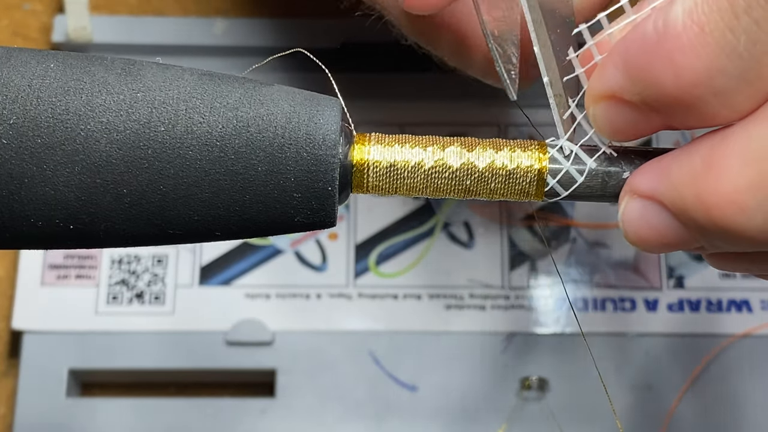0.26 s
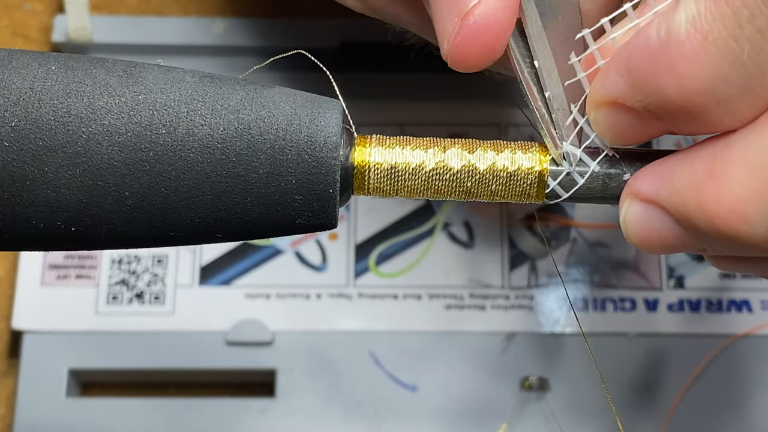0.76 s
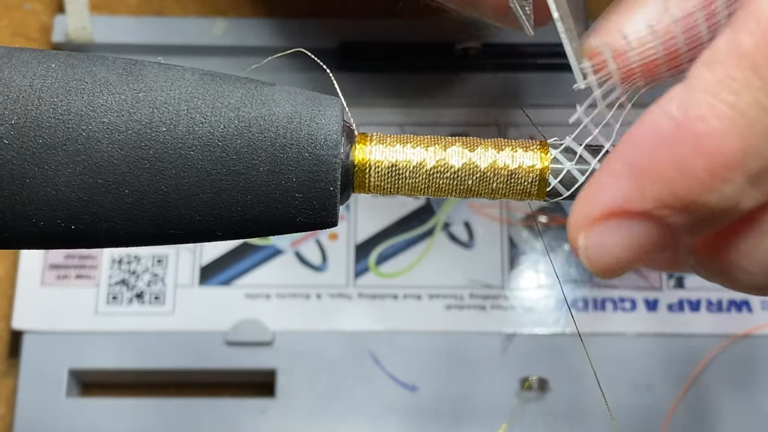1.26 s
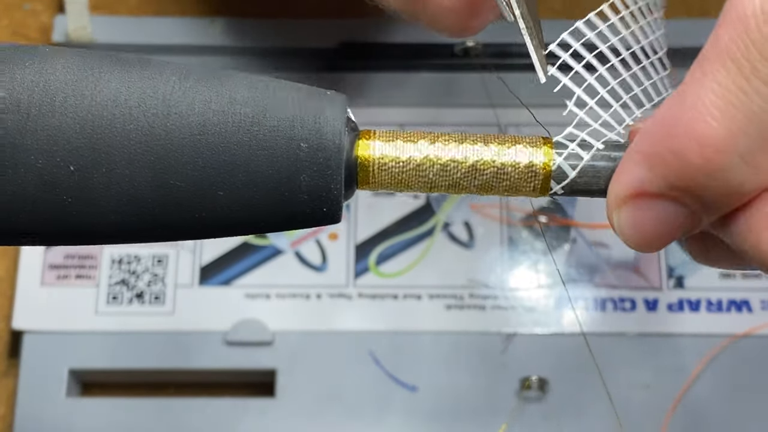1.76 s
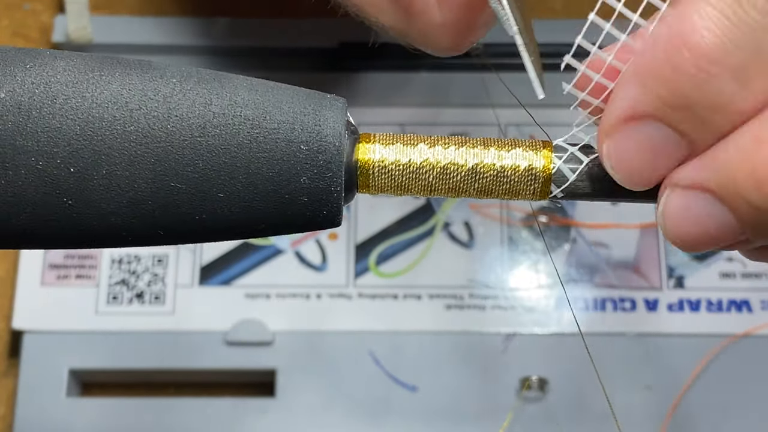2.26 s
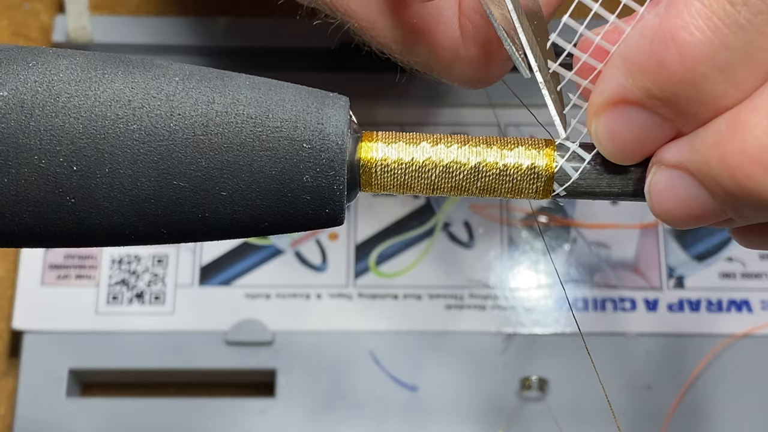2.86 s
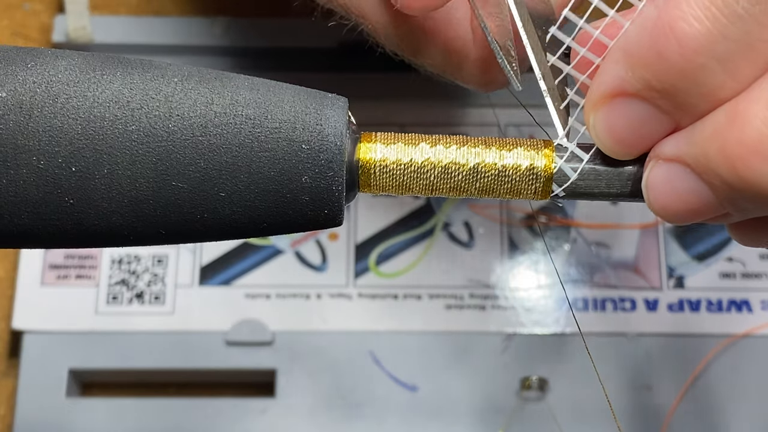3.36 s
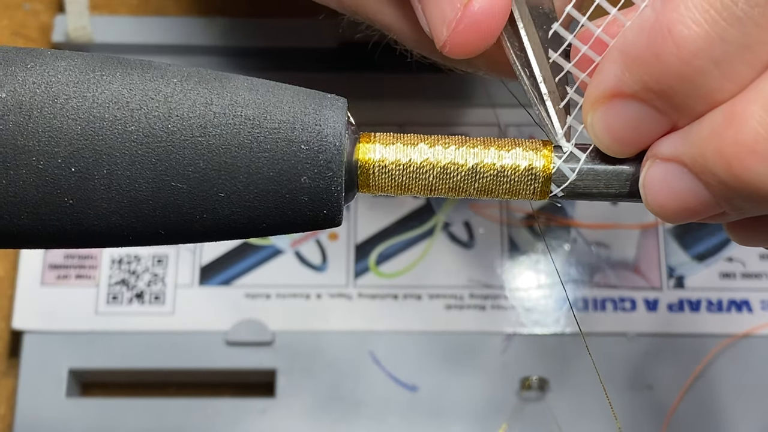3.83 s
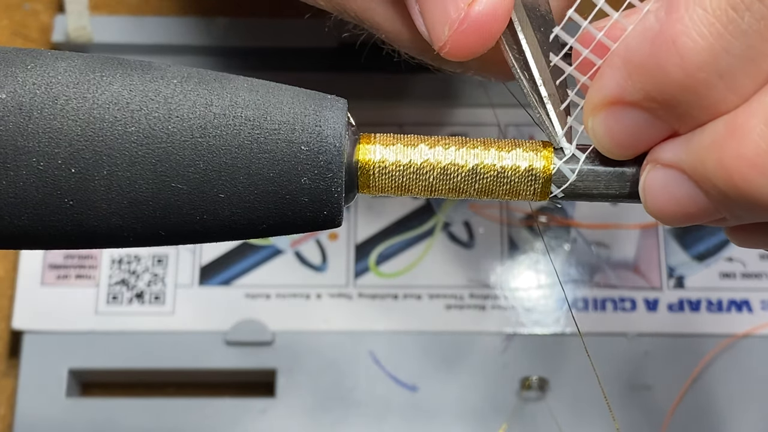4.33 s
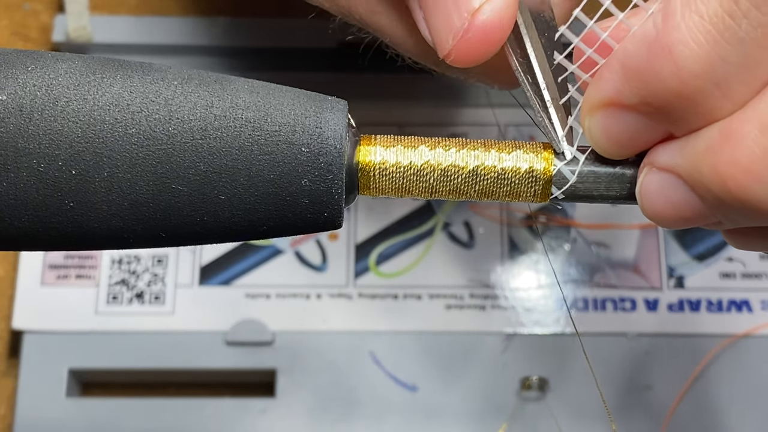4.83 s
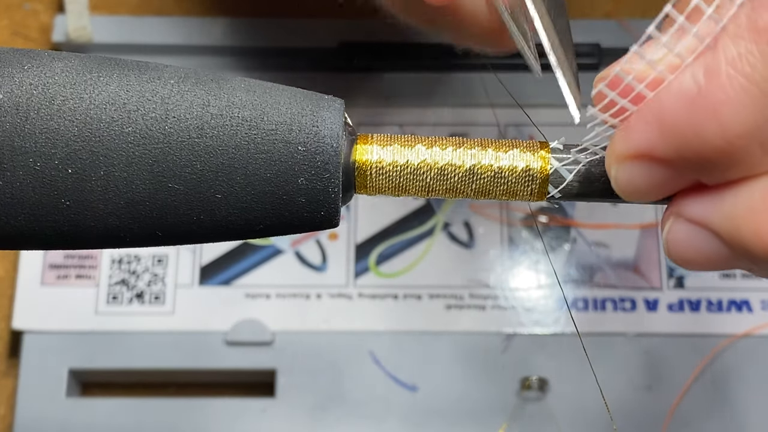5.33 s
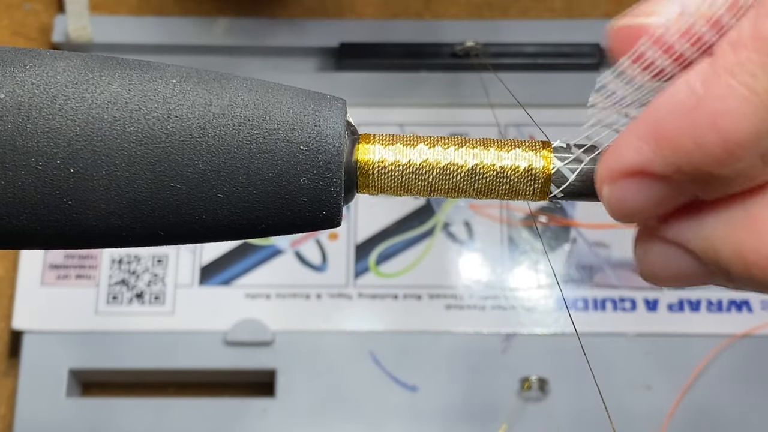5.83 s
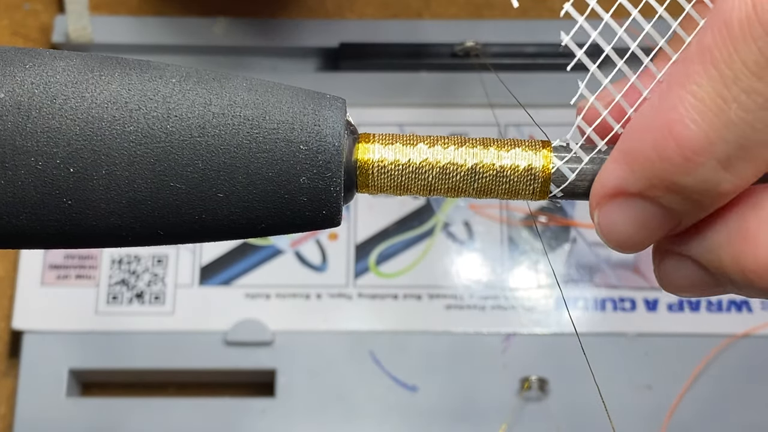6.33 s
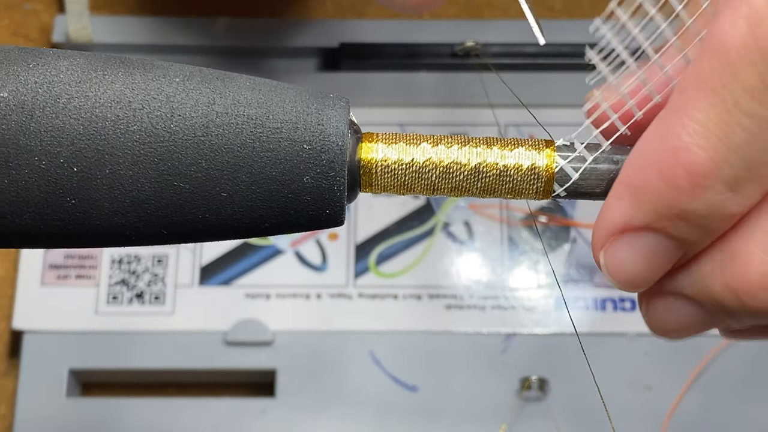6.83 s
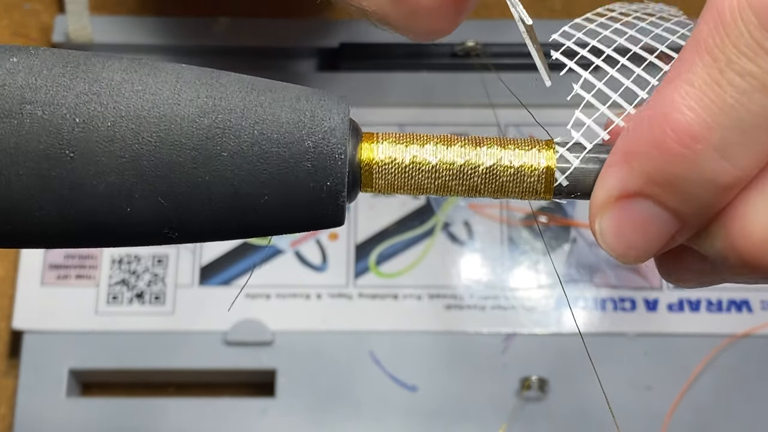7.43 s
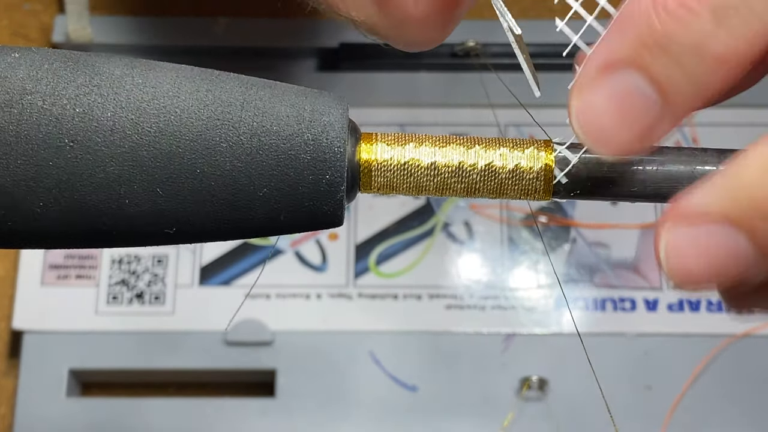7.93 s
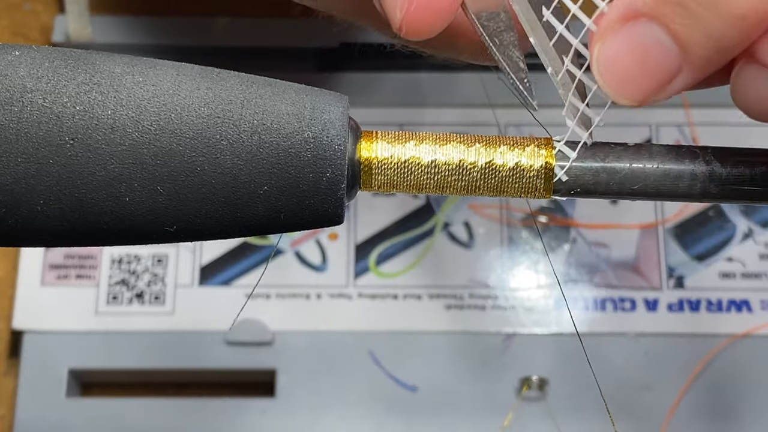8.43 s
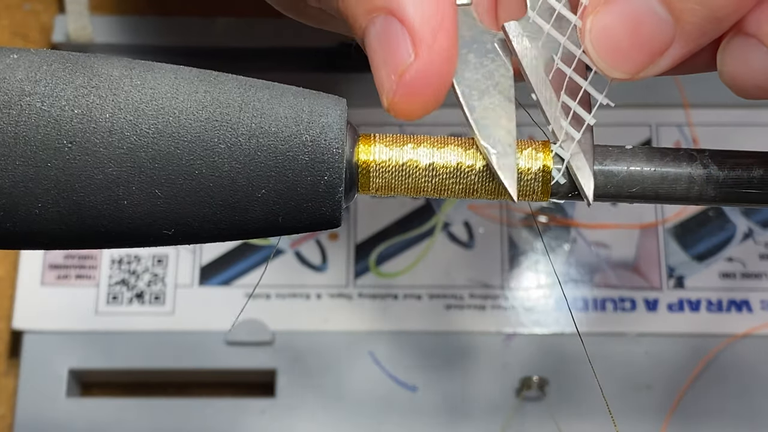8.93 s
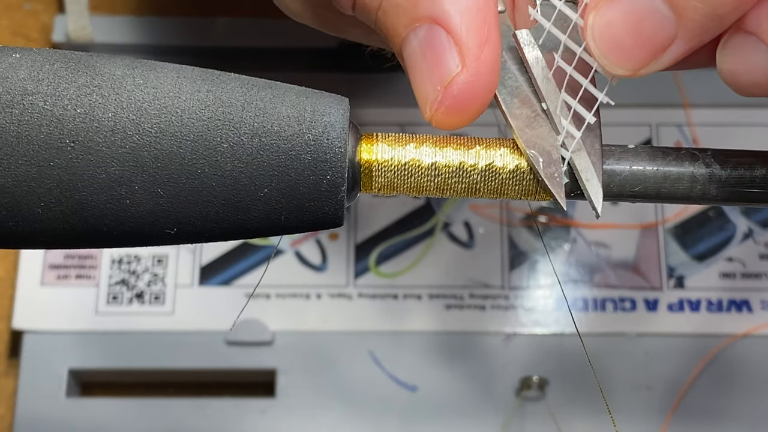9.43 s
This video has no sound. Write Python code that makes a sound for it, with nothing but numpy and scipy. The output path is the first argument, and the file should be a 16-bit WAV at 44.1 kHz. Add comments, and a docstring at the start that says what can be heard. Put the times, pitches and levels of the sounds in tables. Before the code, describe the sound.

Indoors, small scissors trim stiff mesh tape on a rod right by the microphone. A sharp snip comes early, then faint scrapes and ticks, a dense cluster of hard metallic snaps midway, a long near-quiet spell, a double snap later and one last crisp snip. A low hum and rumble continue underneath, with slow puffs of air from moving hands.

```python
"""First a quiet room hums for a moment, then small steel scissors trim mesh tape on a rod, close by.
The blades scrape and snap through the strands: bursts of noise ring the many modes of the steel.
The hollow plastic cradle under the rod knocks along through a few low modes of its own.
Moving hands push slow air at the microphone. An appliance adds steady tones, and shaped noise
gives the rumble and hiss of the room."""
import sys
import numpy as np
from scipy import signal
from scipy.fft import rfft, irfft, next_fast_len
from scipy.io import wavfile
from scipy.ndimage import uniform_filter1d, map_coordinates

SR = 44100
rng = np.random.default_rng(int(sys.argv[2]) if len(sys.argv) > 2 else 0)


def digitize_waveform(pressure):
    """Quantize a signal to 16-bit integers and store it at the path in sys.argv[1].

    Rows of a 2-D input are taken as channels; values are limited to [-1, 1].
    """
    field = np.atleast_2d(pressure).T
    bounded = np.clip(field, -1, 1)
    quanta = np.round(bounded * 32767).astype(np.int16)
    wavfile.write(sys.argv[1], SR, quanta)


def convert_level_to_amplitude(level_db):
    """Map a level in decibels to its linear amplitude factor."""
    exponent = np.asarray(level_db, float) / 20
    return 10 ** exponent


N = 426888  # length in samples


# strands cut and tips touching:
# (time [s], peak level in the blades [dB], cradle peak relative to the blades [dB])
SNAP_EVENTS = [(0.3512, -53.5, -23.5), (0.415, -48.5, -11.5), (0.4764, -52, -8.5), (0.521, -46.5, -20.5),
               (0.5327, -47.5, -21), (0.6165, -59, -5), (0.7091, -20.5, -30.5), (0.998, -45.5, -36),
               (1.0232, -52, -15), (1.0997, -57, -19), (1.292, -60, -28), (1.322, -58, -31),
               (1.36, -50.5, -24), (1.7245, -54.5, 5), (2.029, -47, -18), (2.0445, -31, -22),
               (2.0772, -40, -12), (3.451, -62, -26), (3.5992, -52, -25), (3.7344, -39, -34),
               (3.7491, -34, -25), (3.9539, -63, -4), (4.1308, -54.5, -5), (4.1494, -42, -15),
               (4.2016, -43, -40), (4.2337, -54, -30), (4.2601, -58, -30), (4.6992, -50, -10),
               (4.7121, -27.5, -34), (4.7192, -16, -38.5), (4.7258, -20, -30.5), (4.7344, -22.5, -19),
               (4.9931, -29.5, -27), (5.008, -23, -27), (5.014, -20.5, -26), (5.0239, -24.5, -19),
               (5.0365, -24, -29), (5.043, -14.5, -22.5), (5.0556, -30, -12.5), (5.2954, -49, -32.5),
               (5.3396, -42, -42.5), (5.3774, -43, -39), (5.7703, -60, -11.5), (5.7994, -74, 5),
               (7.0874, -53, 3), (7.1004, -64, -13), (7.7787, -60.5, -15.5), (7.8283, -38, -26),
               (7.8461, -25, -17), (7.8567, -24.5, -15.5), (8.3828, -66.5, 1), (8.4527, -44, -16),
               (9.2721, -33.5, -54.5), (9.6538, -39.5, -47), (9.6614, -15.5, -45)]
CRACK_T60_S, CRACK_RISE_S, KNOCK_T60_S = 0.013, 0.0006, 0.024


def snaps():
    """Each parting strand is a crack of a few milliseconds in the blades, and a soft knock in the cradle."""
    out = np.zeros(N + SR)
    t = np.arange(SR // 6) / SR
    for s, db, cradle_db in SNAP_EVENTS:
        decay = convert_level_to_amplitude(-60 * t / CRACK_T60_S)
        rise = 1 - np.exp(-t / CRACK_RISE_S)
        crack = rng.standard_normal(len(t)) * decay * rise
        crack[0] += 2.5  # the instant of parting
        push = rng.standard_normal(len(t)) * convert_level_to_amplitude(-60 * t / KNOCK_T60_S)
        snap = peak_one(steel(crack, s, wide_db=-7.5, damping=1.1))
        knock = convert_level_to_amplitude(cradle_db) * peak_one(cradle(push, scatter_db=4))
        add_at(out, s, convert_level_to_amplitude(db) * (snap + knock))
    return out[:N]


# strokes of blade on blade, tape and rod:
# (time of the peak [s], swell [s], fade [s], blade level [dB], cradle level [dB])
STROKE_EVENTS = [(0.311, 0.041, 0.094, -67, -82), (.362, 0.091, 0.27, -52.5, -85),
                 (.416, 0.059, 0.026, -48.5, -60), (.45, 0.081, 0.13, -56, -65),
                 (0.541, 0.093, 0.086, -66.5, -92), (.63, .015, .15, -62.5, -69),
                 (.676, 0.063, 0.1, -53, -56.5), (.71, 0.039, 0.033, -39, -57),
                 (.886, .03, 0.042, -92, -68.5), (1.028, 0.039, 0.058, -44.5, -77),
                 (1.3, .02, 0.088, -75, -96), (1.37, 0.075, 0.056, -63, -72),
                 (1.735, 0.013, 0.068, -58, -56.5), (1.762, 0.032, 0.096, -46, -62),
                 (1.825, 0.067, 0.04, -51.5, -74), (2.048, 0.017, 0.024, -42.5, -48),
                 (2.08, 0.043, 0.047, -44, -46), (2.844, 0.083, 0.085, -76, -101),
                 (3.565, .06, 0.071, -69, -71), (3.602, 0.074, 0.11, -60, -58),
                 (3.745, 0.024, 0.067, -38, -51), (3.99, .08, 0.04, -71.5, -63.5),
                 (4.152, 0.022, 0.06, -42, -59.5), (4.19, 0.051, 0.026, -47.5, -83),
                 (4.25, .05, 0.056, -66, -92), (4.495, .04, 0.06, -71.5, -57.5),
                 (4.724, 0.015, 0.047, -25, -44.5), (4.8, 0.071, 0.23, -64.5, -72),
                 (5.0, 0.024, 0.073, -49, -57), (5.042, 0.036, .02, -27, -42.5),
                 (5.075, 0.046, 0.082, -67, -58.5), (5.25, 0.067, .05, -79.5, -68),
                 (5.33, 0.052, 0.1, -55.5, -94), (5.365, .06, 0.055, -58.5, -99.5),
                 (5.775, .015, .08, -68.5, -86), (5.804, 0.038, 0.027, -83, -57), (5.93, .08, .1, -77, -96),
                 (6.61, .1, 0.095, -81.5, -88), (6.78, .1, .04, -79.5, -80),
                 (7.105, 0.044, 0.053, -59.5, -44), (7.15, 0.1, 0.17, -68.5, -54.5),
                 (7.31, 0.052, 0.18, -75.5, -68), (7.4, .12, .1, -76, -82.5),
                 (7.54, 0.12, 0.13, -79.5, -68), (7.69, .06, .04, -82, -89.5),
                 (7.855, 0.036, 0.051, -40.5, -46.5), (8.44, 0.03, .09, -57.5, -62),
                 (8.5, .06, .08, -79, -74.5), (8.635, .05, .06, -80.5, -91.5), (9.02, .07, 0.12, -64, -85),
                 (9.275, .008, 0.063, -51.5, -88), (9.652, 0.03, .04, -57, -58), (9.39, .08, .08, -82, -86),
                 (9.666, .015, 0.03, -23, -47.5)]
EDGE_DB = 24  # level lost over one swell or fade
CRADLE_LAG_S = 0.01  # the cradle builds up a little later


def strokes():
    """Rough edges slip in tiny uneven jerks that drive blades and cradle together."""
    out = np.zeros(N + SR)
    t = np.arange(-SR // 5, SR // 4) / SR  # zero at the peak of the stroke
    for s, swell, fade, db, cradle_db in STROKE_EVENTS:
        def shape(u):
            return convert_level_to_amplitude(-EDGE_DB * np.maximum(-u / swell, u / fade))

        jerks = unit(uniform_filter1d(rng.standard_normal(len(t)), size=90))
        jerk_db = 2.8 * jerks + 1.5 * rng.exponential(size=len(t))
        force = rng.standard_normal(len(t)) * convert_level_to_amplitude(jerk_db)
        scrape = convert_level_to_amplitude(db) * shape(t) * unit(steel(force, s, wide_db=-5, damping=1.5))
        drone = convert_level_to_amplitude(cradle_db) * shape(t - CRADLE_LAG_S) * unit(cradle(force, scatter_db=5.5))
        add_at(out, s + t[0], scrape + drone)
    return out[:N]


# ticks of the pivot: (time [s], peak level [dB], handle tap relative to the tick [dB])
TICK_EVENTS = [(2.254, -49, -41), (3.1739, -48.5, 1)]


def ticks():
    """The loose pivot ticks brightly as the open blades shift, with a weak or strong duller handle tap."""
    out = np.zeros(N + SR)
    t = np.arange(SR // 4) / SR
    for s, db, tap_db in TICK_EVENTS:
        fading = convert_level_to_amplitude(-60 * t / 0.024) + 0.38 * convert_level_to_amplitude(-60 * t / 0.19)  # a fast and a slow decay
        blow = rng.standard_normal(len(t)) * fading
        bright = filtered(blow, lambda f: band(5500, 0.3)(f) ** 4)
        dull = filtered(blow, lambda f: band(2200, 0.6)(f) ** 4)
        add_at(out, s, convert_level_to_amplitude(db) * (peak_one(bright) + convert_level_to_amplitude(tap_db) * peak_one(dull)))
    return out[:N]


# modes of the blades: (pitch [Hz], width before damping [Hz], relative level before scatter [dB])
BLADE_MODES = [(1000, 52, -4), (1223, 30, -0.5), (1390, 14, 1.5), (1870, 180, -10.5), (2130, 48, 3),
               (2405, 14, 4.5), (2770, 40, 6), (3001, 35, 5), (3340, 40, 4.5), (3615, 35, 3.5),
               (3855, 30, 3), (3886, 31, -5.5), (4280, 29, -0.5), (4475, 33, 1), (4490, 25, 2),
               (4780, 25, 3), (5484, 120, -10), (6130, 37, 5.5), (6704, 440, -6.5), (7380, 47, -16),
               (8102, 290, 0.5), (9720, 530, 0), (11050, 360, 1)]
# stretches of those modes, handles to tips, before the grip changes them:
# (centre [Hz], width as share of pitch [1], relative level [dB])
MODE_STRETCHES = [(1250, 0.47, -13.5), (2050, 0.47, -8), (3115, 0.48, 0), (4700, 0.42, -1),
                  (6600, 0.29, -5.5), (9900, .52, -11.5)]
# the grip, from a time on: (time [s], modes most affected [Hz], their lift [dB],
# brightness [dB per octave], lift of the handles [dB])
GRIP_CHANGES = [(0.28, 3000, 6.5, 7, 18.5), (0.61, 3600, -22, -4.5, -23), (0.69, 3227, 8, 4.5, 0),
                (0.95, 3230, -22, -5, -32), (1.28, 3330, 4.5, -1.5, -5), (1.72, 6600, 8.5, 3, 20),
                (2.01, 3244, 17, -2.5, -2), (2.75, 2050, 25, -6, 13), (3.44, 8260, 28, 9, 10.5),
                (3.52, 2050, 1, -7, -13), (3.72, 2050, -1, -4, -1.5), (4.12, 2050, -3, -5, -13),
                (4.19, 2050, -9, 6.5, 0), (4.46, 2050, 7, -1, 0), (4.705, 4640, 5, 3, -1),
                (4.99, 4700, 11, 1.5, 7), (5.04, 4040, 19, 4.5, 10.5), (5.28, 4700, 27, -5, -3),
                (5.35, 9900, 16, 9.5, -11), (5.76, 2050, 22, -1, -3), (7.07, 6600, 17.5, -7.5, 3.5),
                (7.26, 5460, 25, 3.5, 3), (7.5, 2050, 12.5, 0.5, -1.5), (7.77, 3470, 9, -2, 3.5),
                (8.37, 3237, 7.5, 3.5, 15.5), (8.95, 2620, 3.5, -3.5, 10), (9.26, 2050, -9.5, 3.5, -21.5),
                (9.63, 2987, 3, 5, 5)]
GRIP_OCTAVES = 0.35  # reach of a grip along the modes


def steel(force, s, wide_db, damping):
    """The grip at time s sets which stretch of modes rings; a wide rasp fills in between the modes."""
    starts = [row[0] for row in GRIP_CHANGES]
    now = max(np.searchsorted(starts, s + 0.005) - 1, 0)
    _, grip_hz, lift_db, bright_db, handles_db = GRIP_CHANGES[now]
    levels = []
    for hz, _, db in MODE_STRETCHES:
        tilt_db = bright_db * np.log2(hz / MODE_STRETCHES[2][0])
        nearness = np.exp(-(np.log2(hz / grip_hz) / GRIP_OCTAVES) ** 2)
        levels.append(db + tilt_db + lift_db * nearness)
    levels[0] += handles_db
    ring = modes(BLADE_MODES, scatter_db=3.5, damping=damping)

    def gain(f):
        power = convert_level_to_amplitude(2 * (levels[-1] - 49)) * (f > 12000)  # a faint fizz above the last mode
        for db, (hz, share, _) in zip(levels, MODE_STRETCHES):
            distance = abs(2 * np.log((f + 1) / hz) / share)
            power = power + convert_level_to_amplitude(2 * db) / (hz * share) / (1 + distance ** 10)
        return np.sqrt((abs(ring(f)) ** 2 + convert_level_to_amplitude(2 * wide_db)) * power)

    return filtered(force, lambda f: causal(gain(f)))


# modes of the cradle: (pitch [Hz], width [Hz], relative level before scatter and the wide band [dB])
CRADLE_MODES = [(585, 81, -8.5), (692, 35, -5), (734.5, 24, 0), (791, 8.7, 1), (865, 50, -9)]


def cradle(force, scatter_db):
    """The hollow cradle radiates only around its own few modes."""
    ring = modes(CRADLE_MODES, scatter_db)
    return filtered(force, lambda f: ring(f) * band(760, 0.8)(f) ** 2)


# slow air pushes: (time of the peak [s], peak level [dB], half length [s])
AIR_PUSHES = [(.037, -26, .05), (.156, -19, .035), (.264, -31, .04), (.947, -37, .04), (1.225, -24, .035),
              (2.145, -21, .07), (2.8, -31, .06), (3.209, -29, .035), (3.56, -40, .05), (3.849, -32, .08),
              (4.49, -36, .12), (5.34, -40, .06), (6.26, -30, .08), (6.49, -25, .08), (6.81, -35, .07),
              (7.33, -40, .1), (7.71, -40, .06), (8.08, -30, .08), (8.519, -32, .05), (9.19, -41, .1),
              (9.66, -31, .06)]
# spectrum of the draught: (frequency [Hz], relative level [dB per Hz])
DRAUGHT_COLOUR = [(1, -20.5), (4, 2.5), (12, 5), (25, -11.5), (45, -36.5), (90, -67.5)]
DRAUGHT_DB = -49.5  # the air between pushes, rms
SWING_HZ = 10  # how fast a push swings back and forth


def air():
    """Draughts heave below the range of pitch; each hand movement adds a short swing of pressure."""
    noise = rng.standard_normal(N)
    out = convert_level_to_amplitude(DRAUGHT_DB) * unit(filtered(noise, lambda hz: convert_level_to_amplitude(along(DRAUGHT_COLOUR, hz))))
    t = np.arange(N) / SR
    for s, db, half in AIR_PUSHES:
        way = rng.choice([-1, 1])  # towards or away
        swing = np.cos(2 * np.pi * SWING_HZ * (t - s))
        out += way * convert_level_to_amplitude(db) * np.exp(-((t - s) / half) ** 2) * swing
    return out


# how long the room rings: (frequency [Hz], time to fall by 60 dB [s])
ROOM_DECAY = [(500, .3), (3000, 0.14), (6000, 0.099), (10000, .14), (15000, 0.24)]


def room(x):
    """The room's short answer is fading noise, a new tail every third of a second."""
    out = np.zeros(N + 2 * SR)
    step = SR // 3
    for start in range(0, N, step):
        hz, t, z = signal.stft(rng.standard_normal(SR // 2), SR, nperseg=256)
        fading = convert_level_to_amplitude(-60 * t / along(ROOM_DECAY, hz)[:, None])
        tail = signal.istft(z * fading, SR, nperseg=256)[1]
        wet = signal.fftconvolve(x[start:start + step], tail / np.linalg.norm(tail))
        out[start + 200:][:len(wet)] += wet  # the answer starts 200 samples late
    return out[:N]


# mains buzz: (multiple of MAINS_HZ [1], mean level [dB rms])
MAINS_TONES = [(1, -54.5), (2, -75)]
# motor: (multiple of SHAFT_HZ [1], mean level [dB rms])
SHAFT_TONES = [(1, -70), (2, -72.5), (3, -83.5), (4, -85.5), (5, -89), (8, -96.5), (10, -84.5), (53, -99),
               (62, -99), (80, -87)]
# slow fan's side tones: (frequency [Hz], mean level [dB rms])
FAN_TONES = [(49, -69.5), (92, -81), (102.5, -75), (135, -75), (150, -84), (255, -87.5), (285, -99.5)]
MAINS_HZ, SHAFT_HZ = 120, 58.95  # twice the mains; a motor slipping just under the mains


def hum():
    """Steady mains buzz, a motor's shaft orders up to a thin whine, and a fan's unsteady side tones."""
    turn = 2 * np.pi * np.arange(N) / SR

    def tone(hz, db, drift):
        level = np.sqrt(2) * convert_level_to_amplitude(db + drift * wobble(29))
        phase = 1.6 * drift * wobble(1.7) + rng.uniform(0, 2 * np.pi)
        return level * np.sin(hz * turn + phase)

    buzz = sum(tone(k * MAINS_HZ, db, drift=0.1) for k, db in MAINS_TONES)
    # higher orders waver more
    motor = sum(tone(k * SHAFT_HZ, db, drift=0.53 * k ** 0.3) for k, db in SHAFT_TONES)
    fan = sum(tone(hz, db, drift=1.5) for hz, db in FAN_TONES)
    return buzz + motor + fan


# spectrum of the rumble: (frequency [Hz], relative level [dB per Hz])
RUMBLE_COLOUR = [(15, -31), (25, -0.5), (42, -8.5), (65, -15.5), (85, -26.5), (160, -30), (210, -37.5),
                 (245, -28.5), (275, -41.5), (400, -48.5), (520, -82), (880, -120)]
# spectrum of the hiss: (frequency [Hz], relative level [dB per Hz])
HISS_COLOUR = [(240, -35.5), (400, -5.5), (438, -19), (459, -0.5), (503, -16), (577, -8), (623, -12.5),
               (772, -11), (1470, -17.5), (2360, -12), (3910, -20), (4630, -11.5), (5000, -19.5),
               (7320, -29), (15500, -33)]
RUMBLE_DB, HISS_DB = -55.5, -78  # rms; the hiss wavers around its level


def room_tone():
    """Ventilation rumble and far hiss, both shaped from noise."""
    rumble = unit(filtered(rng.standard_normal(N), lambda hz: convert_level_to_amplitude(along(RUMBLE_COLOUR, hz))))
    hiss = unit(filtered(rng.standard_normal(N), lambda hz: convert_level_to_amplitude(along(HISS_COLOUR, hz))))
    return convert_level_to_amplitude(RUMBLE_DB) * rumble + convert_level_to_amplitude(HISS_DB + 0.6 * wobble(9)) * hiss


def modes(table, scatter_db=0, damping=1):
    """Causal response of a body's resonances, each at a new strength; a touch that stays widens them."""
    gains = convert_level_to_amplitude(scatter_db * rng.standard_normal(len(table)))

    def response(f):
        total = 0
        for k, (gain, (hz, width, db)) in enumerate(zip(gains, table)):
            total = total + (-1) ** k * gain * convert_level_to_amplitude(db) * band(hz, damping * width / hz)(f)
        return total

    return response


def band(centre_hz, share):
    """One resonance, its width a share of its pitch."""
    def response(f):
        loss = 1j * f * share * centre_hz
        return loss / (centre_hz ** 2 - f * f + loss)

    return response


def causal(gain):
    """The response of this gain that answers only after it is struck."""
    cepstrum = irfft(np.log(gain + 1e-9))
    half = len(cepstrum) // 2
    # fold the mirrored half forward in time
    folded = np.r_[cepstrum[0], 2 * cepstrum[1:half], np.zeros(len(cepstrum) - half)]
    return np.exp(rfft(folded))


def filtered(x, response):
    """x shaped by a complex response of frequency."""
    m = 2 * next_fast_len(x.shape[-1] // 2 + 4096)
    spectrum = rfft(x, m) * response(np.fft.rfftfreq(m, 1 / SR))
    return irfft(spectrum, m)[..., :x.shape[-1]]


def wobble(rate):
    """A smooth random curve, rate knots a second."""
    knots = rng.standard_normal(int(N * rate / SR) + 4)
    return map_coordinates(knots, [np.arange(N) * rate / SR])


def along(points, hz):
    """Values between (Hz, value) points, on a log axis of frequency."""
    f, v = np.transpose(points)
    return np.interp(np.log(hz + 1), np.log(f + 1), v)


def unit(x):
    """x scaled to an rms of one."""
    return x / np.sqrt(np.mean(x ** 2) + 1e-20)


def peak_one(x):
    """x scaled to a peak of one."""
    return x / np.abs(x).max()


def add_at(out, s, sound):
    """Adds a sound into out from time s on."""
    out[round(s * SR):][:len(sound)] += sound


def scene():
    """The scissor work with its room answer, over the hum, room tone and moving air."""
    work = snaps() + strokes() + ticks()
    mix = work + convert_level_to_amplitude(-11) * room(work) + hum() + room_tone() + air()
    return mix[None]  # one channel


def roll_off(x):
    """The treble ends steeply here."""
    return signal.sosfilt(signal.butter(12, 16470, fs=SR, output="sos"), x)


def record(dry):
    """The phone keeps nothing above its band limit of 15800 Hz."""
    limited = filtered(dry, lambda hz: hz < 15800)
    return roll_off(limited)


dry = scene()
out = record(dry)
digitize_waveform(out)
```